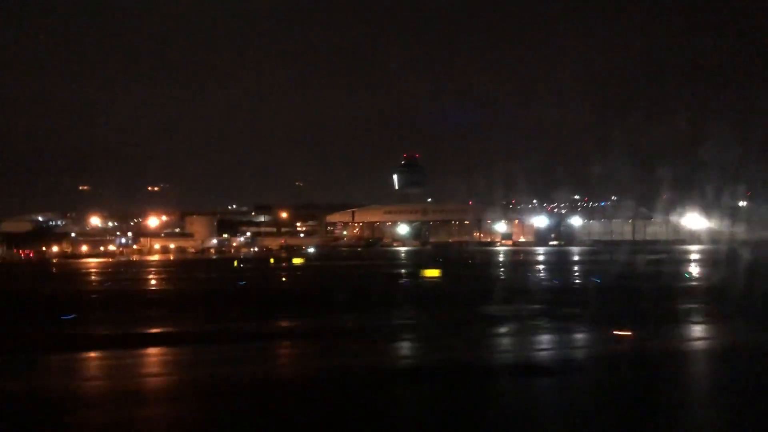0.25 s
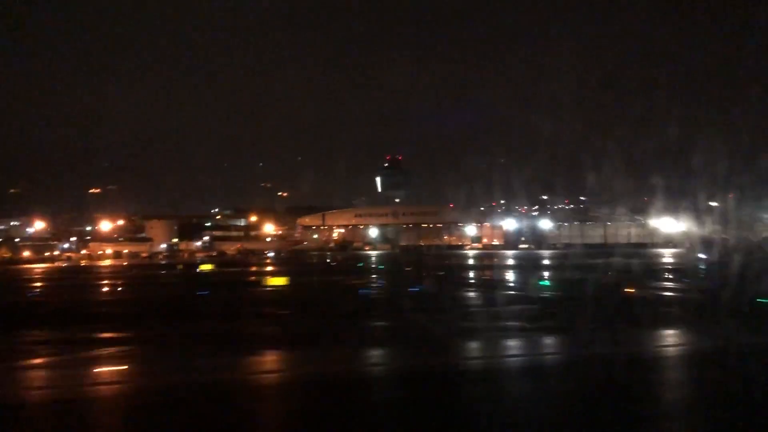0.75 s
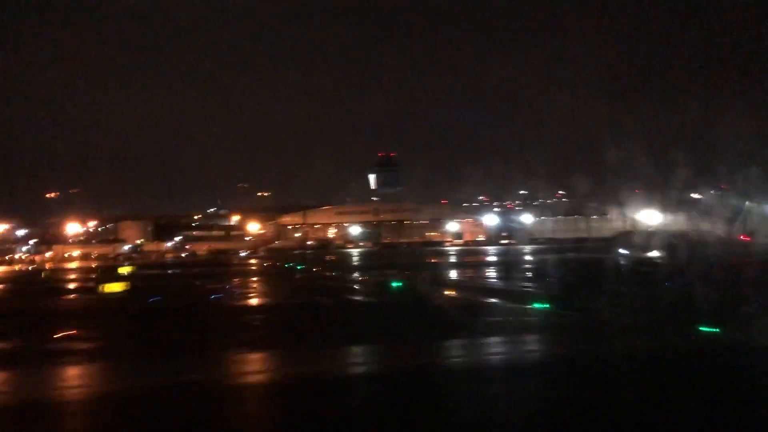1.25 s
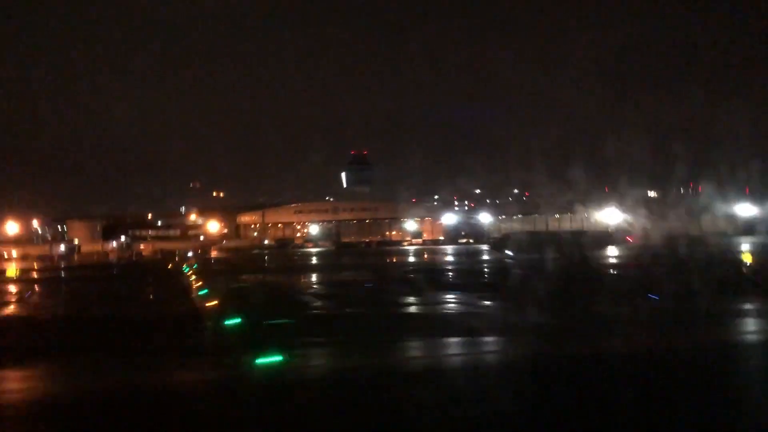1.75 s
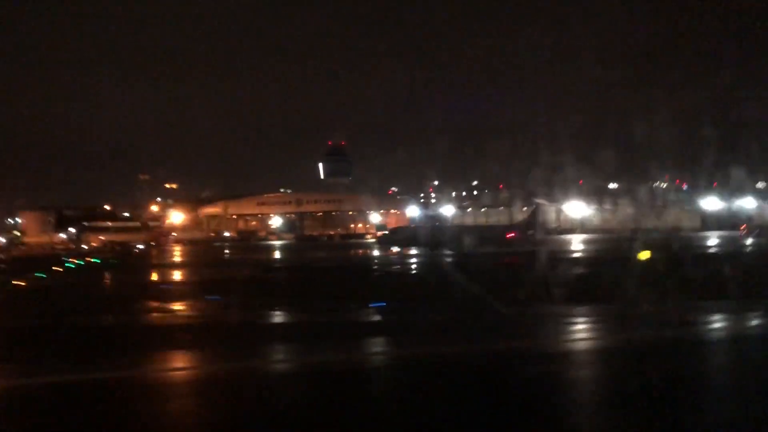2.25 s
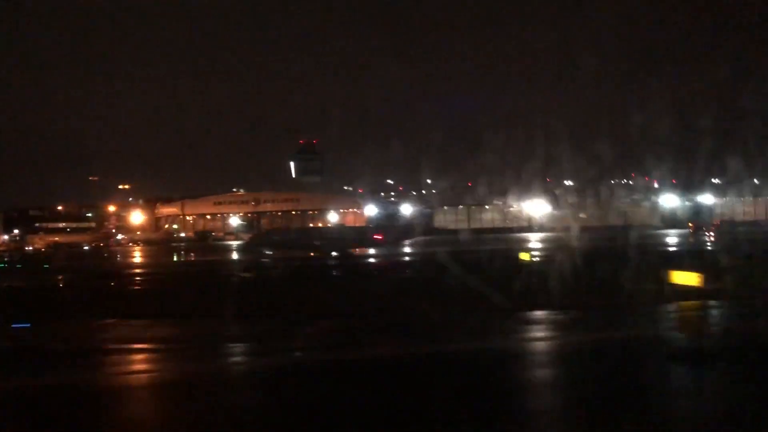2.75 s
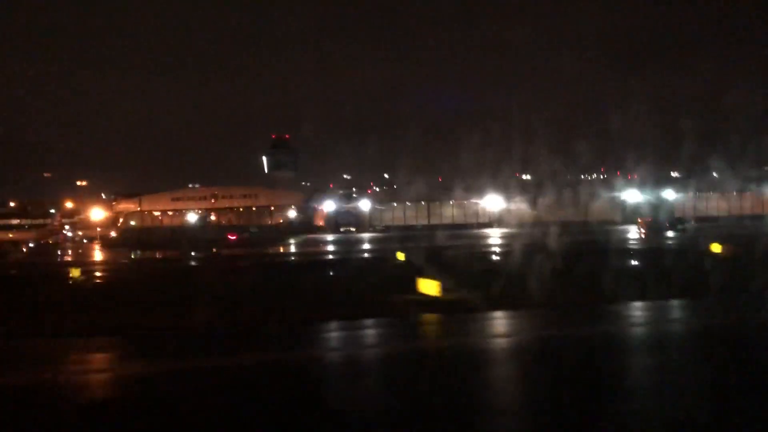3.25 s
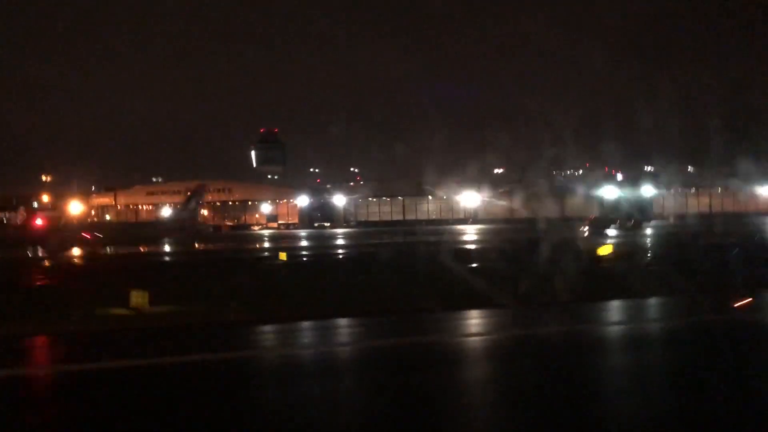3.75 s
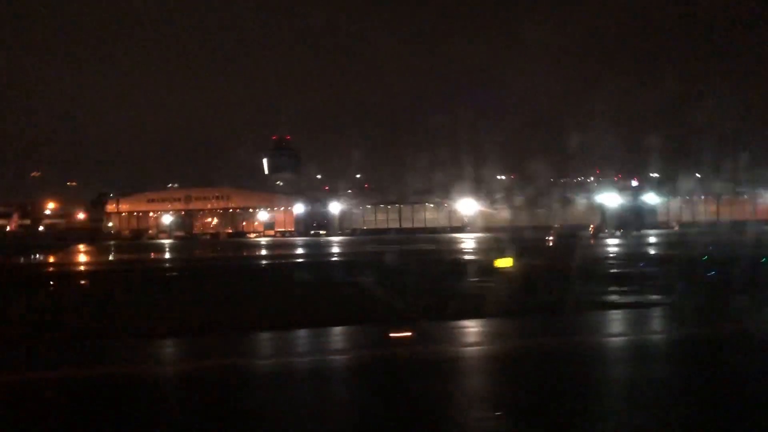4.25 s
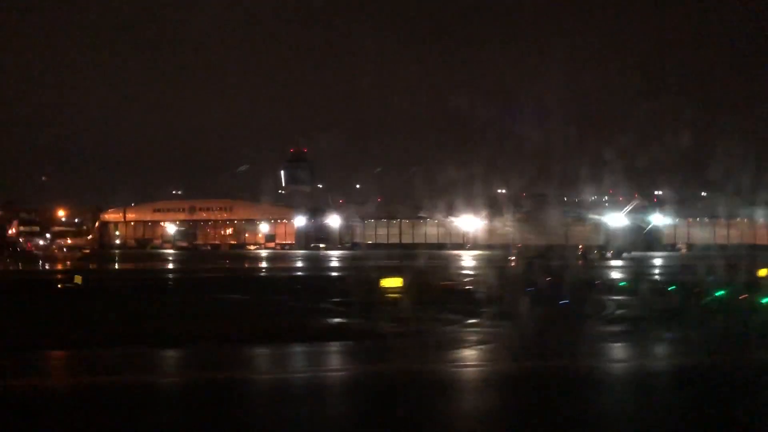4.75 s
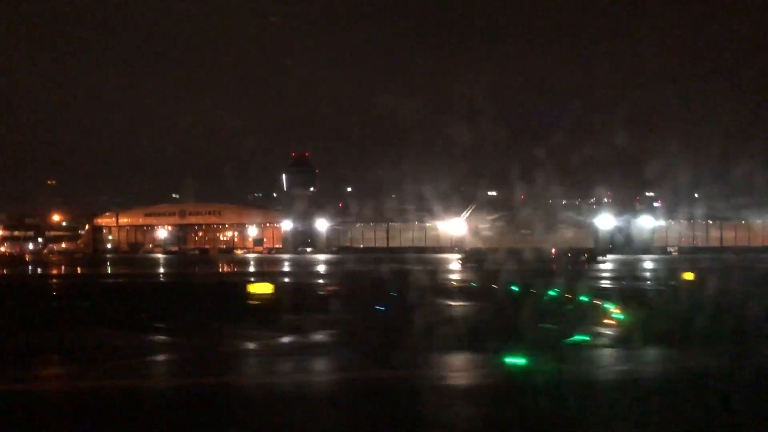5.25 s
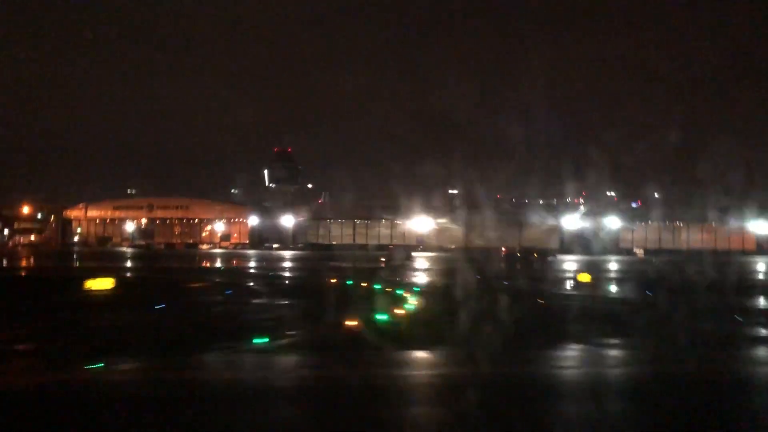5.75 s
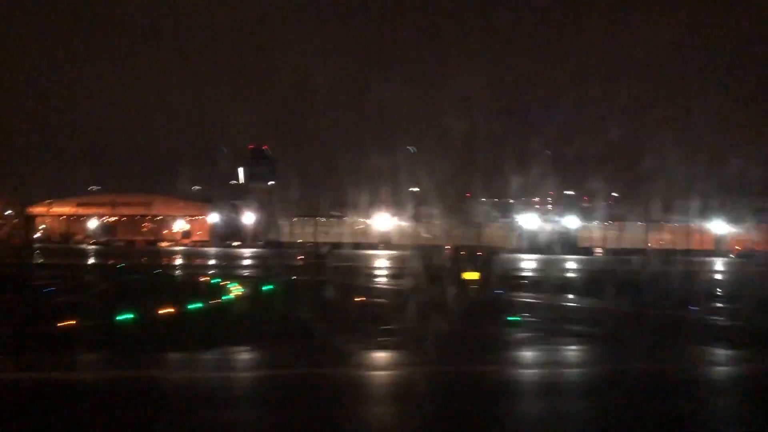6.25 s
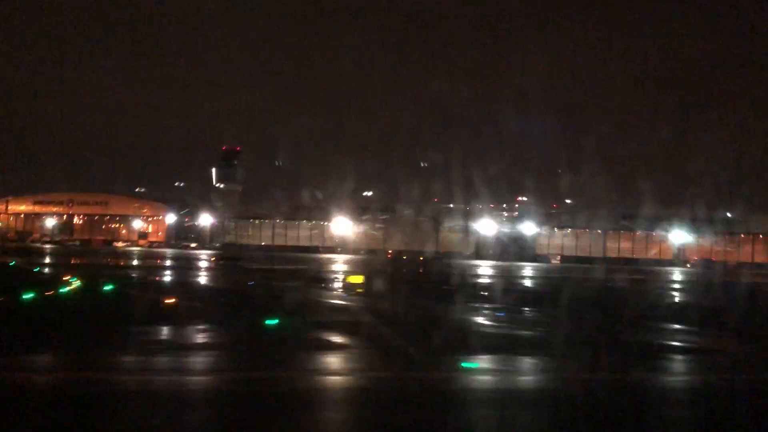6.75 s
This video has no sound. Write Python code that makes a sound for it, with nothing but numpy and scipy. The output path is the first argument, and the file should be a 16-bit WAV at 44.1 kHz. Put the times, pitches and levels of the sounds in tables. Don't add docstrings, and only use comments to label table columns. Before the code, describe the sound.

A jet slows on a wet runway, heard inside the cabin on a phone microphone. Full, bassy reverse-thrust noise sinks away while early bumps come thick and fast. Halfway through, a slam sets bins and panels clattering, followed by a tiny sharp buckle snap. Then a quieter rumble continues with slow booming heaves, a sagging low shaft hum, faint whines, vent hiss and scattered plastic ticks.

```python
import sys
import numpy as np
from scipy import signal
from scipy.io import wavfile

SR = 44100
rng = np.random.default_rng(int(sys.argv[2]) if len(sys.argv) > 2 else 0)


def volts_from_decibels(level):
    exponent = np.asarray(level, float) / 20
    return 10 ** exponent


def log_audio(samples):
    frames = np.atleast_2d(samples).T
    limited = np.clip(frames, -1, 1)
    pcm = np.round(limited * 32767).astype(np.int16)
    wavfile.write(sys.argv[1], SR, pcm)


N = 309141
RUN_IN = 4000
COARSE = 40
VENTS_DB = -38


def rms_one(x):
    return x / np.sqrt(np.mean(x ** 2) + 1e-20)


def in_time(rows):
    s, *columns = np.transpose(rows)
    return [np.interp(np.arange(N) / SR, s, c) for c in columns]


def fine(coarse):
    return np.interp(np.arange(N) / COARSE, np.arange(len(coarse)), coarse)


def drift(rate_hz):
    r = np.exp(-2 * np.pi * COARSE * rate_hz / SR)
    noise = rng.standard_normal(N // COARSE + 2002)
    slow = signal.lfilter([1], [1, -2 * r, r * r], noise)[2000:]
    return fine(rms_one(slow))


def swell(at_s, length_s):
    t = np.arange(0, N + COARSE, COARSE) / SR
    return np.exp(-.5 * ((t - np.c_[at_s]) / np.c_[length_s]) ** 2)


def shakes(events, length_s):
    rise_s = .0007
    out = np.zeros(N)
    for s, peak_db in events:
        i = round(s * SR)
        t = np.arange(min(round(6 * length_s * SR), N - i)) / SR
        out[i:i + len(t)] += volts_from_decibels(peak_db) * (1 - np.exp(-t / rise_s)) * np.exp(-t / length_s)
    return out


def band_pass(x, edges_hz, order=2):
    return signal.sosfilt(signal.butter(order, edges_hz, "band", fs=SR, output="sos"), x)


def white():
    return rng.standard_normal((2, N))


def grit(per_s, spread_db):
    size_db = spread_db * np.minimum(rng.exponential(1, (2, N)), 4)
    signs = rng.choice([-1, 1], (2, N))
    return volts_from_decibels(size_db) * signs * (rng.random((2, N)) < per_s / SR)


def colour(sources, spectrum, patchy_db):
    hz, level_db = np.transpose(spectrum)
    count = round(3 * np.log2(hz[-1] / hz[0]))
    edges = np.geomspace(hz[0], hz[-1], count + 1)
    sources = np.hstack([sources[:, -RUN_IN:], sources])
    out, together = 0, drift(2.5)
    for k, (low, high) in enumerate(zip(edges, edges[1:])):
        band = band_pass(sources[k % 2], [low, high])[RUN_IN:]
        band_db = np.interp(np.log(low * high) / 2, np.log(hz), level_db)
        flicker_db = patchy_db * (0.22 * together + drift(4.4))
        out = out + band * volts_from_decibels(band_db + flicker_db)
    return rms_one(out)


def ring(at_s, level_db, hz, t60_s):
    at = np.round(np.asarray(at_s) * SR).astype(int)
    first, out = at.min(), np.zeros(N)
    end = min(at.max() + round(2 * t60_s * SR), N)
    clicks = np.full(end - first, 1e-18)
    clicks[at - first] += volts_from_decibels(level_db)
    r, w = volts_from_decibels(-60 / (t60_s * SR)), 2 * np.pi * hz / SR
    out[first:end] = signal.lfilter([0, np.sin(w)], [1, -2 * r * np.cos(w), r * r], clicks)
    return out


def tone(hz, level_db):
    return np.sqrt(2) * volts_from_decibels(level_db) * np.sin(2 * np.pi * np.cumsum(hz) / SR)


def hum(hz, width_hz):
    r = np.exp(-np.pi * width_hz / SR)
    section = [1, 0, -1, 1, -2 * r * np.cos(2 * np.pi * hz / SR), r * r]
    return rms_one(signal.sosfilt([section, section], rng.standard_normal(N + SR))[SR:])


def reverse_thrust():
    # start_s, level_db
    thrust = [
        (0, -20),
        (.3, -23.5),
        (1.1, -28),
        (2.2, -31.5),
        (3.1, -36),
        (4.7, -35),
        (5.4, -39),
        (6.3, -38.5),
        (7.01, -38.5),
    ]
    return in_time(thrust)[0]


def runway_joints():
    # start_s, peak_db
    joints = [(.05, -18), (.14, -33), (.4, -10.5), (.56, -36), (.86, -15.5), (1.2, -14.5), (1.329, -17.5),
              (1.509, -33), (1.7, -19), (1.85, -15.5), (1.96, -19), (2.199, -19), (2.4, -34), (2.8, -38),
              (3.05, -40), (3.295, -15.5), (3.8, -26), (4.05, -37), (4.3, -25), (5.521, -32), (5.86, -21.5),
              (6.25, -26.5), (6.769, -22.5)]
    s, peak_db = np.transpose(joints)
    return fine(volts_from_decibels(peak_db) @ swell(s, np.full(len(s), .039)))


def engine_roar(roar_db, bumps):
    # pitch_hz, level_db per Hz
    spectrum = [(56, -23), (95, 0), (150, -3), (260, -8), (380, -10.5), (480, -13), (620, -17.5),
                (705, -22.5), (910, -29.5), (1010, -25.5), (1760, -51.5), (2940, -63), (3560, -43),
                (5810, -61.5), (7670, -49), (13100, -103), (15500, -54)]
    thrust = np.sqrt(np.maximum(volts_from_decibels(2 * roar_db) - volts_from_decibels(2 * (VENTS_DB - 0.45)), 0))
    level = np.hypot(thrust, volts_from_decibels(-20.5) * bumps)
    return volts_from_decibels(4.5) * level * colour(white(), spectrum, patchy_db=0.45)


def tyre_rumble(roar_db, bumps):
    # pitch_hz, level_db per Hz
    spectrum = [(25, -36), (35, -11), (48, 10.5), (60, 13), (75, 4.5), (100, 2.5), (150, 1), (190, -2.5),
                (240, -10.5), (330, -10.5)]
    rumble_db, thrust_share, deep_hz, deep_bump_db = -24.5, 0.17, 85, -20
    rolling = volts_from_decibels(rumble_db + thrust_share * (roar_db - roar_db.min()))
    tyres = colour(white(), spectrum, patchy_db=-0.6)
    deep = signal.sosfiltfilt(signal.butter(2, deep_hz, fs=SR, output="sos"), tyres)
    upper = np.hypot(rolling, bumps) * (tyres - deep)
    return upper + np.hypot(rolling, volts_from_decibels(deep_bump_db) * bumps) * deep


def fuselage_boom():
    # start_s, level_db, pitch_hz, length_s
    mode_swells = [(0.14, -25, 67.7, .05), (0.448, -20, 61.04, 0.097), (.56, -23, 60.4, 0.066),
                   (0.67, -18.5, 62.6, 0.07), (0.81, -24, 58.8, 0.054), (0.937, -19.5, 62.1, 0.064),
                   (1.049, -18, 61.75, 0.056), (1.199, -19, 60.74, 0.18), (1.297, -13, 60.6, 0.057),
                   (1.444, -23, 60.06, 0.13), (1.582, -19, 68.7, 0.12), (1.72, -20, 68.5, 0.049),
                   (1.886, -16, 63.8, 0.076), (2.055, -19, 62.7, 0.097), (2.24, -16, 65.1, 0.082),
                   (2.376, -25, 62, 0.067), (2.594, -23.5, 57.6, 0.07), (2.769, -18.5, 64.5, 0.068),
                   (2.873, -19.5, 64.7, 0.13), (4.604, -17.5, 60, 0.08), (4.741, -20.5, 60.9, 0.076),
                   (4.899, -19, 64.54, 0.077), (5.069, -19, 63.6, 0.058), (5.153, -20, 62.8, 0.11),
                   (5.38, -18.5, 65.4, 0.057), (5.49, -14.5, 63.36, 0.035), (5.658, -21, 60.55, 0.14),
                   (5.784, -17.5, 60.5, 0.082), (5.946, -23.5, 57.75, 0.15), (6.15, -20, 62, 0.044),
                   (6.239, -17.5, 62, 0.098), (6.438, -25.5, 60, 0.099), (6.559, -24, 57, 0.13),
                   (6.768, -23.5, 60.65, 0.13), (6.903, -22, 60, 0.072)]
    # start_s, pitch_hz, level_db
    wheel = [
        (3.07, 63.8, -22),
        (3.13, 64.1, -18),
        (3.26, 62.36, -23),
        (3.3, 63.8, -14.5),
        (3.72, 63.18, -12.5),
        (3.84, 60.92, -18),
        (3.95, 62.5, -16.5),
        (4.1, 61.74, -17.5),
        (4.48, 60.4, -19),
        (4.55, 60.5, -30),
    ]
    s, level_db, hz, length_s = np.transpose(mode_swells)
    signs = (-1.) ** np.arange(len(s))
    swelling = fine((volts_from_decibels(level_db) * signs) @ swell(s, np.maximum(0.49 * length_s, .01)))
    mode_hz = np.interp(np.arange(N) / SR, s, hz) + 0.86 * drift(5.3)
    fade_in = (wheel[0][0] - .05, wheel[0][1], -80)
    fade_out = (wheel[-1][0] + .05, wheel[-1][1], -80)
    wheel_hz, wheel_db = in_time([fade_in, *wheel, fade_out])
    stirred = volts_from_decibels(-33) * hum(62, width_hz=17.6)
    return swelling * tone(mode_hz, 0) + stirred + tone(wheel_hz, wheel_db + 0.69 * drift(18))


def wheel_order():
    # start_s, level_db
    strength = [(0, -38), (2.6, -59), (2.92, -31.5), (3.15, -34), (3.3, -59), (3.55, -32), (4.25, -32.5),
                (4.5, -39.5), (4.72, -30), (5.7, -30), (5.95, -31.5), (7.01, -46.5)]
    order_hz, order_at_s, sag_hz_per_s = 198.1, 4.7, 7.5
    hz = order_hz - sag_hz_per_s * (np.arange(N) / SR - order_at_s)
    return tone(hz + 1.51 * drift(4.18), in_time(strength)[0] + 1.5 * drift(6.4))


def floor_panel(roar_db, bumps):
    from_roar = volts_from_decibels(-39 + roar_db - roar_db.min())
    from_joints = volts_from_decibels(-12.5) * bumps
    return np.hypot(from_roar, from_joints) * hum(196.2, width_hz=26)


def bin_knocks(bins):
    # start_s, peak_db
    knocks = [(2.826, -28), (3.165, -29), (3.305, -27), (3.318, -18), (3.33, -28), (3.344, -27),
              (3.372, -37), (3.43, -25), (3.689, -25), (4.215, -31), (4.275, -22), (4.325, -20),
              (4.345, -29), (4.455, -22.5), (4.643, -26), (5.479, -27.5), (5.865, -30), (6.108, -27),
              (6.145, -30), (6.2, -27.5), (6.375, -32), (6.491, -27), (6.545, -33), (6.78, -42),
              (6.818, -30), (6.937, -25)]
    # pitch_hz, level_db, t60_s
    lid = (765, -8, 0.05)
    s, peak_db = np.transpose(knocks)
    lid_hz, lid_db, lid_t60_s = lid
    lids = ring(s, peak_db + lid_db, lid_hz, lid_t60_s)
    return lids + volts_from_decibels(-17) * shakes(knocks, length_s=.015) * bins


def clip_ticks(clips, rattle):
    # start_s, peak_db
    creaks = [(.008, -46), (1.1, -44), (1.11, -44), (1.122, -47), (1.39, -48), (1.378, -48), (1.84, -50),
              (2.171, -55), (2.8245, -48), (1.34, -52), (1.7315, -54), (1.908, -55), (3.0475, -53),
              (3.053, -53), (3.75, -52), (3.77, -52), (4.242, -50), (4.613, -52), (5.675, -53), (5.71, -52),
              (5.85, -52), (5.906, -51), (6.76, -51), (3.2966, -46), (3.476, -45), (3.6636, -47),
              (3.6832, -47), (3.8704, -47), (4.136, -52), (4.2323, -49), (4.4988, -48), (4.58, -50),
              (4.8121, -53), (4.865, -52), (4.9504, -50), (4.98, -46), (5.1149, -50), (5.4452, -49),
              (5.985, -48), (6.0453, -50)]
    # start_s, peak_db
    clacks = [(.575, -52), (.59, -52), (.602, -53), (6.3295, -48), (6.491, -45), (6.5924, -45),
              (6.6393, -48), (6.67, -51), (6.793, -46), (6.8104, -46), (6.8443, -48)]
    tick_s, stray_per_s, stray_db = .003, 5, -66
    count = round(stray_per_s * N / SR)
    stray = rng.random((count, 2)) * [N / SR - .1, 6] + [0, stray_db]
    ticks = shakes(creaks, tick_s) + shakes(stray, tick_s)
    large_clip = rms_one(band_pass(rattle, [9800, 12800], order=3))
    return volts_from_decibels(1) * ticks * clips + shakes(clacks, tick_s) * large_clip


def trim():
    # pitch_hz, level_db per Hz
    spectrum = [(500, -6), (800, 0), (1400, -2), (2600, -10), (4000, -8), (7000, -10), (11000, -12),
                (16500, -18)]
    # start_s, level_db
    surface = [(0, -47), (1.4, -49), (1.75, -52.5), (2.1, -54), (2.3, -53), (2.6, -54.5), (2.72, -51.5),
               (3.06, -51), (3.4, -49.5), (3.6, -49), (3.75, -49.5), (3.9, -50.5), (4.08, -52.5),
               (4.3, -47), (4.7, -49), (5.0, -50.5), (5.7, -51), (6.3, -49.5), (7.01, -51)]
    # start_s, peak_db
    jolts = [(.008, -36), (.583, -37), (.8794, -35), (.9094, -35), (1.104, -37), (1.116, -37),
             (1.2985, -35), (1.385, -39), (1.852, -35), (1.983, -41), (2.676, -39), (2.69, -37),
             (2.827, -34), (3.046, -36), (3.1263, -34), (3.156, -35), (3.3144, -31), (3.303, -37),
             (3.326, -36), (3.337, -39), (3.392, -43), (3.354, -43), (3.374, -40), (3.6829, -38),
             (3.697, -49), (3.72, -39), (4.211, -46), (4.33, -41), (4.462, -41), (4.499, -50), (5.8, -35),
             (4.2334, -35), (4.273, -33), (4.4508, -29), (5.426, -35), (5.9084, -37), (6.175, -33),
             (6.199, -35), (6.486, -38), (6.635, -37), (6.933, -29.5)]
    # start_s, length_s, bins_db, panels_db, clips_db
    slam = (3.298, .075, -41, -48, -51)
    rattle = colour(grit(9000, spread_db=3), spectrum, patchy_db=.6)
    bins = rms_one(band_pass(rattle, [600, 1600]))
    panels = rms_one(band_pass(rattle, [2000, 9500]))
    clips = rms_one(band_pass(rattle, [7500, 19000]))
    chatter_db = in_time(surface)[0] + 1.2 * drift(8) - 4
    steady = volts_from_decibels(chatter_db) * (volts_from_decibels(8) * bins + panels + volts_from_decibels(-7.5) * clips)
    jolted = volts_from_decibels(-14) * shakes(jolts, length_s=.014) * (panels + volts_from_decibels(-7) * clips)
    slam_s, slam_length_s, bins_db, panels_db, clips_db = slam
    slam_mix = volts_from_decibels(bins_db) * bins + volts_from_decibels(panels_db) * panels + volts_from_decibels(clips_db) * clips
    slammed = shakes([(slam_s, 0)], slam_length_s) * slam_mix
    return steady + jolted + slammed + bin_knocks(bins) + clip_ticks(clips, rattle)


def loose_latch():
    # start_s, peak_db
    tinks = [
        (0.0697, -43),
        (0.0787, -37),
        (1.3004, -54),
        (1.3159, -43),
        (1.6102, -44),
        (2.6753, -54),
        (3.1233, -48),
        (4.2113, -52),
    ]
    # pitch_hz, level_db, t60_s
    modes = [(3504, -1, 0.098), (5050, -7, 0.05), (3420, -14, .04), (7900, -14, .04), (11400, -13, .05),
             (13200, -17, .04)]
    s, peak_db = np.transpose(tinks)
    return sum(ring(s, peak_db + db + 2, hz, t60_s) for hz, db, t60_s in modes)


def fitting_pings():
    # start_s, peak_db, pitch_hz, t60_s
    pings = [(0.8779, -38, 6400, 0.04), (.887, -39, 6700, .04), (2.685, -40, 3500, .03),
             (2.695, -41, 3450, .03), (2.679, -47, 12300, 0.021), (2.688, -47, 12900, 0.021),
             (2.698, -48, 12500, .02), (4.7, -30, 1300, .03), (6.11, -30, 1200, .03),
             (3.311, -31, 1800, .02), (6.185, -44, 4550, .03), (2.826, -41, 2300, .02),
             (3.128, -40, 2300, .015), (3.156, -38, 2200, .02), (3.158, -37, 4200, .02),
             (3.303, -35, 2300, .03), (3.378, -39, 2350, .02), (4.281, -38, 3540, .02),
             (4.468, -39, 4650, .03), (6.49, -39, 2450, .03), (1.9857, -38, 4200, 0.034),
             (2.8239, -38, 4200, 0.03), (4.2737, -38, 4400, 0.027), (4.4537, -34, 4650, 0.044),
             (4.4614, -41, 3400, 0.02), (6.1741, -38, 4030, 0.038), (6.1892, -39, 4100, 0.033),
             (6.205, -41, 3750, .03), (6.4459, -40, 4000, 0.03), (4.468, -35, 2750, 0.019),
             (.008, -31, 4000, 0.008), (.008, -34, 6100, 0.008), (6.595, -42, 2480, .03),
             (6.64, -43, 2470, .03), (6.795, -42, 2480, .03), (6.935, -37, 4050, .02),
             (1.297, -40, 5000, .04), (1.6, -43, 5100, .03), (1.68, -46, 8300, .03),
             (1.34, -50, 12200, .02), (4.236, -43, 7600, .03)]
    out = np.zeros(N)
    for s, db, hz, t60_s in pings:
        out += ring([s], db - 5.5, hz, np.clip(t60_s, .005, .032))
        out += ring([s + .002], db - 11, 1.07 * hz, np.clip(t60_s / 2, .005, .032))
    return out


def buckle_snap():
    # start_s, peak_db
    snap = [
        (3.5618, -27.5),
    ]
    # pitch_hz, level_db, t60_s
    modes = [(6720, -10, 0.012), (8700, -16, 0.0073), (9700, -22, .005), (10700, -14, 0.005),
             (12200, -10, .005), (14000, -8, .005), (15000, -14, .004)]
    snap_s, snap_db = snap[0]
    contacts_s = snap_s + np.array([0, .0004, .0009, .0015, .0022])
    out = np.zeros(N)
    for hz, db, t60_s in modes:
        at_s = contacts_s + rng.uniform(0, 0.00027, 5)
        out += ring(at_s, snap_db + db + rng.normal(0, 2.3, 5), hz, t60_s)
    return out


def whines():
    # start_s, end_s, start_hz, end_hz, width_hz
    tones = [(-.2, 1.35, 15450, 15000, 200), (1.2, 1.75, 14900, 14700, 250), (.6, 2.9, 8150, 7500, 130),
             (.7, 1.9, 9950, 9450, 250), (.62, .78, 12100, 12100, 40), (3.9, 7.8, 6700, 6560, 220),
             (4.8, 7.3, 4080, 4030, 110), (-.5, 2.5, 2740, 2735, 35), (4.8, 7.5, 6602, 6602, 8),
             (6.2, 6.5, 1700, 1696, 4), (-1, 5, 1023, 1023, 12), (5, 7.5, 12150, 12000, 400),
             (2.5, 2.9, 865, 862, 12), (4.8, 5.35, 432, 415, 16), (6.35, 6.95, 665, 650, 10),
             (3.5, 4.2, 400, 405, 15), (3.7, 4.0, 815, 810, 10), (6.14, 6.3, 4050, 4050, 40),
             (3.9, 4.2, 150, 148, 14), (6.2, 6.4, 2250, 2230, 60), (2.75, 3.3, 2250, 2230, 80),
             (.95, 1.1, 11750, 11750, 40), (-.6, .4, 125, 130, 22), (1.7, 2.55, 137, 141, 16),
             (4.55, 5.05, 97, 95, 12), (2.6, 3.9, 88, 85, 12)]
    tones_db = [-67, -75, -68, -67.5, -75, -64, -63.5, -64, -73, -57, -54, -72, -51, -40, -48, -44.5, -48.5,
                -62, -35.5, -63, -66, -76, -23, -29, -34, -35]
    out = np.zeros(N)
    for (start_s, end_s, start_hz, end_hz, width_hz), level_db in zip(tones, tones_db):
        i, j = max(round(start_s * SR), 0), min(round(end_s * SR), N)
        share = (np.arange(i, j) / SR - start_s) / (end_s - start_s)
        phase = 2 * np.pi * np.cumsum(start_hz + (end_hz - start_hz) * share) / SR
        pole = np.exp(-np.pi * width_hz / SR)
        smear = signal.lfilter([1], [1, -pole], rng.standard_normal((2, j - i)))
        level = np.sqrt(np.abs(np.sin(np.pi * share))) * volts_from_decibels(level_db + 1.7 * drift(3.7)[i:j])
        out[i:j] += level * rms_one(smear[0] * np.cos(phase) + smear[1] * np.sin(phase))
    return out


def air_vents():
    # pitch_hz, level_db per Hz
    spectrum = [(140, -2.5), (230, -4), (339, -8.5), (434, -1), (545, -12), (1100, -20), (1230, -25.5),
                (1870, -22), (2230, -24), (2910, -30.5), (3990, -29.5), (5990, -38.5), (6770, -36),
                (8370, -36), (15500, -51)]
    # start_s, level_db
    airflow = [
        (0, -3),
        (1.5, -3),
        (2.3, -12),
        (2.8, -3),
        (3.3, -3),
        (4.1, -3),
        (5, -3.5),
        (6, -2.5),
        (7.01, -2.5),
    ]
    return volts_from_decibels(VENTS_DB + in_time(airflow)[0]) * colour(white(), spectrum, patchy_db=2.16)


def cabin(x):
    t60_s, tail_db = .15, -9
    t = np.arange(round(.3 * SR)) / SR
    tail = rng.standard_normal(len(t)) * volts_from_decibels(-60 * t / t60_s) * (t > .002)
    tail = tail / np.sqrt(np.sum(tail ** 2))
    tail = signal.lfilter(*signal.butter(1, 900, "high", fs=SR), tail)
    return x + volts_from_decibels(tail_db) * signal.fftconvolve(x, tail)[:N]


def scene():
    roar_db, bumps = reverse_thrust(), runway_joints()
    airborne = volts_from_decibels(1.5) * cabin(engine_roar(roar_db, bumps) + air_vents())
    structure = tyre_rumble(roar_db, bumps) + fuselage_boom() + floor_panel(roar_db, bumps)
    rattles = trim() + loose_latch() + fitting_pings() + buckle_snap()
    return (airborne + structure + rattles + wheel_order() + whines())[None]


def low_pass(x):
    return signal.sosfilt(signal.butter(12, 15730, fs=SR, output="sos"), x)


def record(dry):
    x = np.hstack([dry[:, RUN_IN:0:-1], dry])
    x = signal.sosfilt(signal.butter(3, 38, "high", fs=SR, output="sos"), x)
    x = signal.sosfilt(signal.ellip(12, .5, 70, 15900, fs=SR, output="sos"), x)[:, RUN_IN:]
    return low_pass(x)


dry = scene()
out = record(dry)
log_audio(out)
```